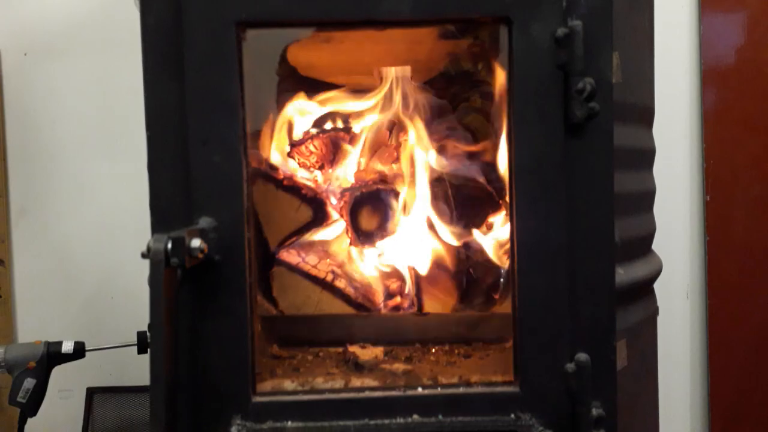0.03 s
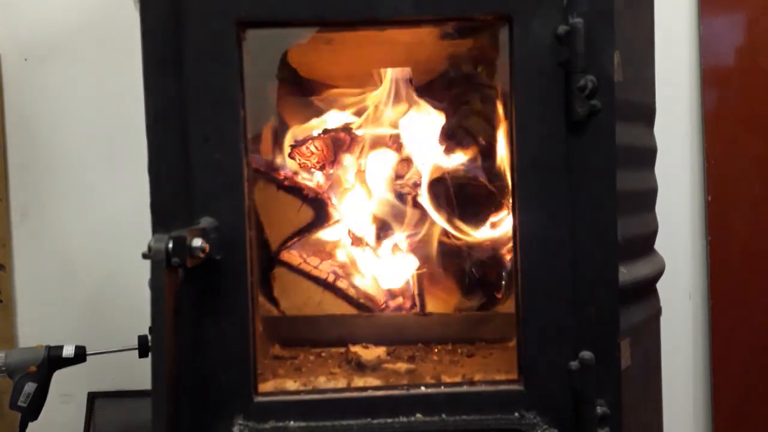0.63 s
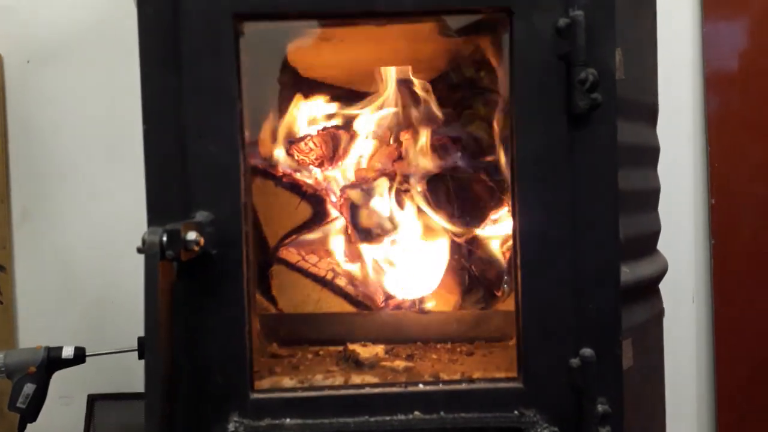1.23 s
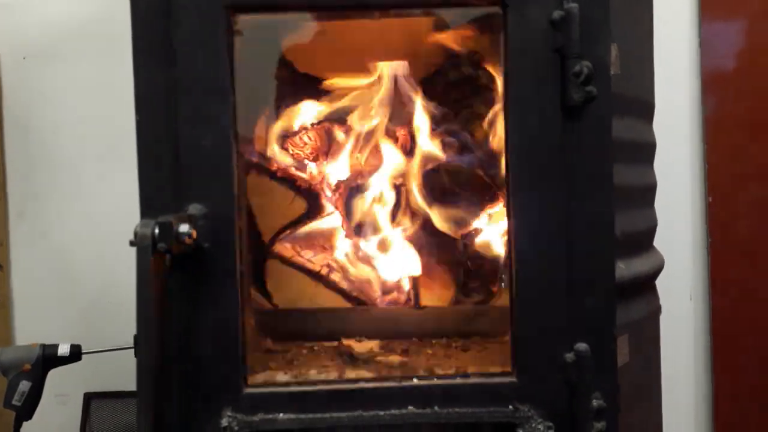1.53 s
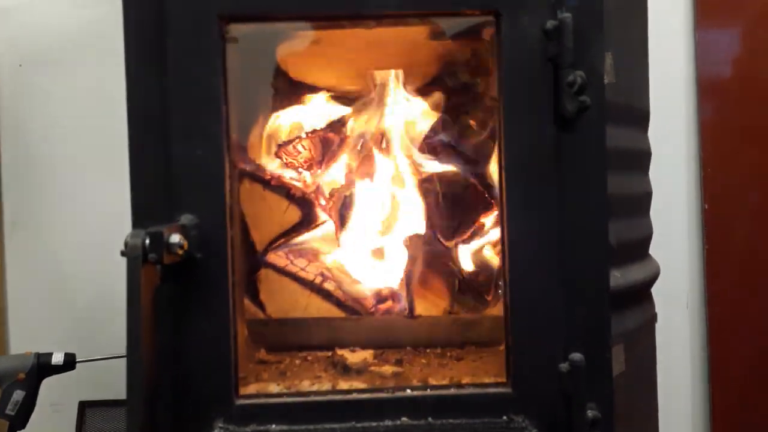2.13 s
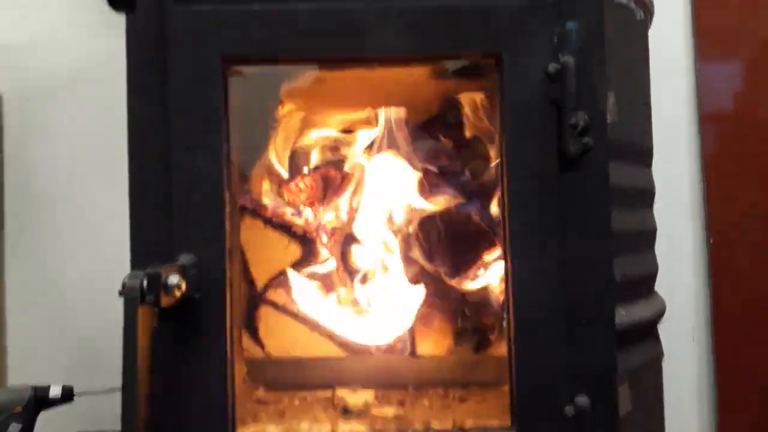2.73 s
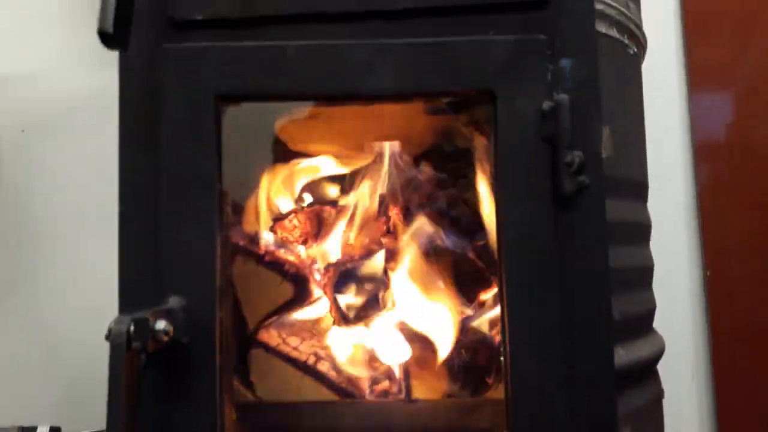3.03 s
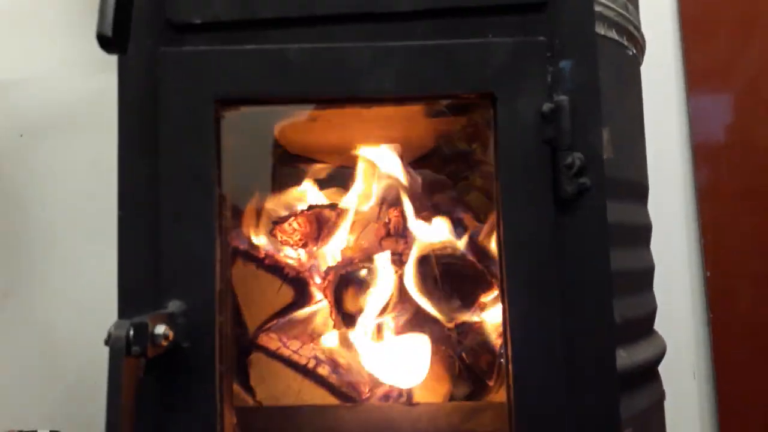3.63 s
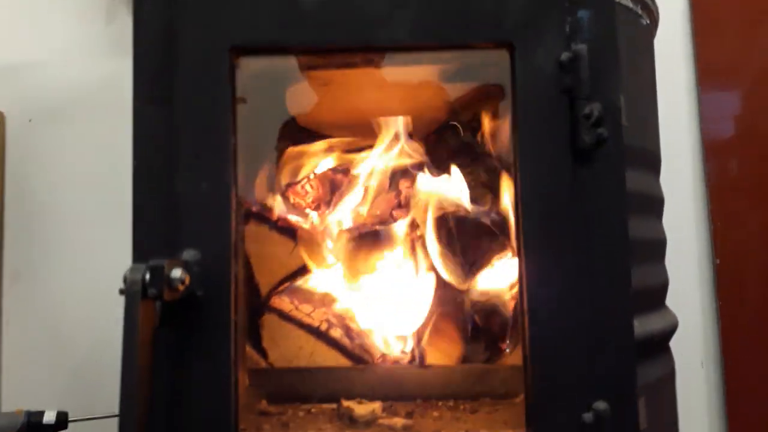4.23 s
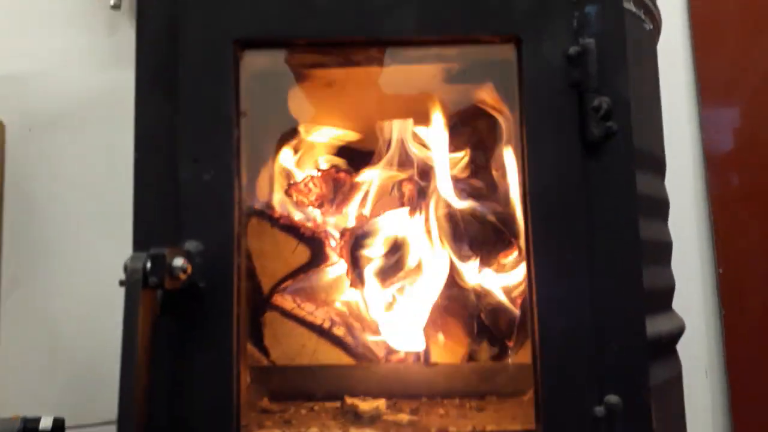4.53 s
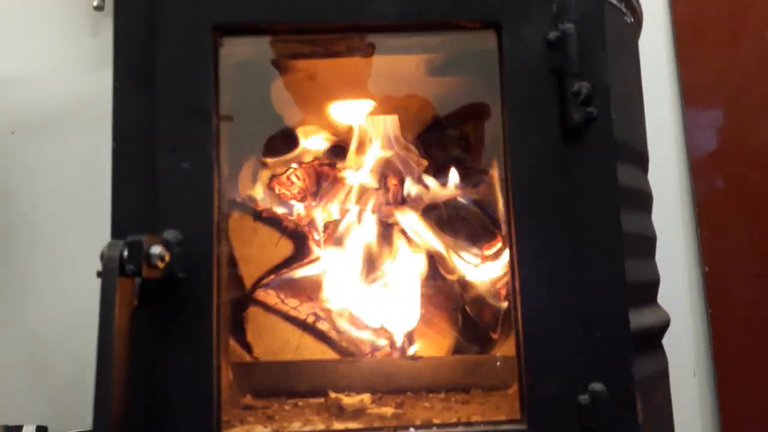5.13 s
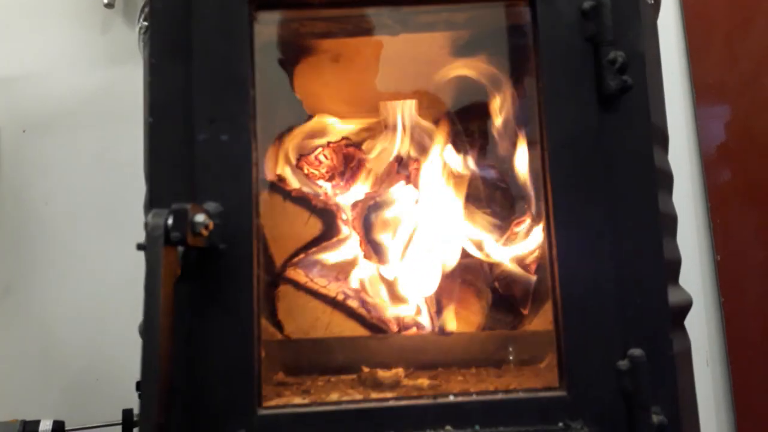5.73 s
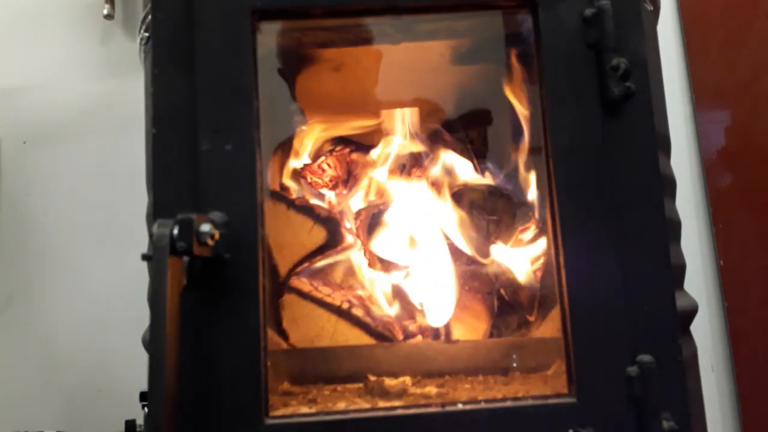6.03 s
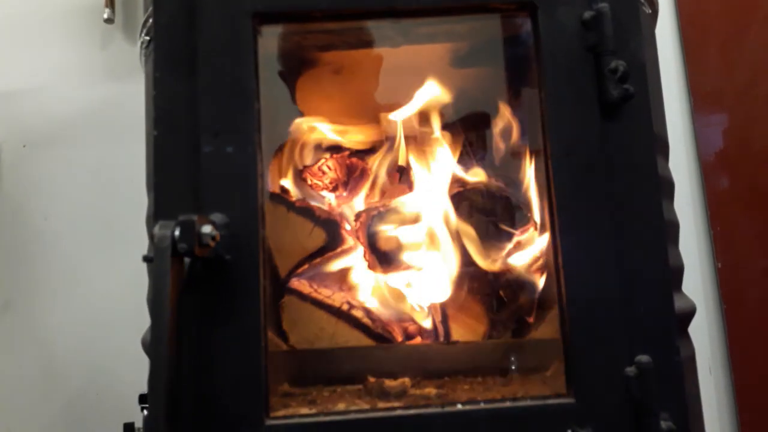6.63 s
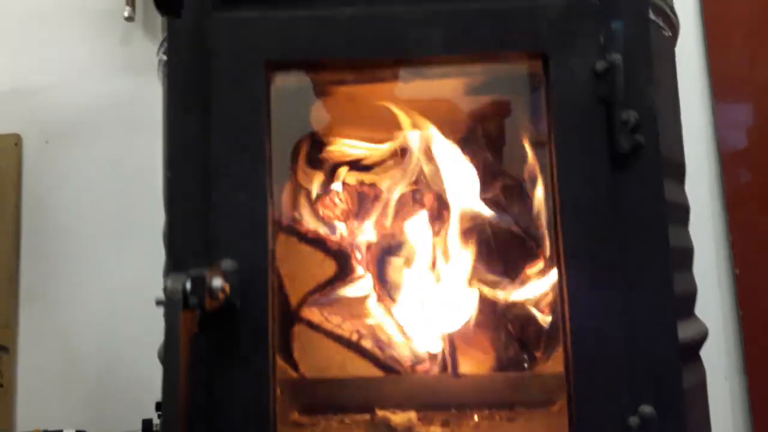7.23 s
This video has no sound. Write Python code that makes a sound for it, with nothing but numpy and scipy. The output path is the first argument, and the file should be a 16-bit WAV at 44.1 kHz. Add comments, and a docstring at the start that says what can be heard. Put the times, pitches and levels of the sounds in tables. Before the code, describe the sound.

Logs burn behind the glass door of an iron stove, making a low, fluttering rumble with soft thumps and faint, muffled pops. A small fan motor buzzes throughout, with a thin high whine and a light rush of air. About three seconds in comes one sharp snap, and the quiet crackling carries on with occasional thin ticks. It is heard indoors, from a hand-held phone an arm's length away.

```python
"""A room with an iron stove, an arm's length from a hand-held phone. Logs burn behind the glass door:
flames rumble in the firebox, gas pockets catch with soft thumps and resin bursts in dull pops.
Now and then something ticks, and once there is a sharp snap. A small fan motor buzzes throughout
over a rush of air; its overtones shift as the phone moves through the room's standing waves."""
import sys
import numpy as np
from scipy import signal
from scipy.fft import rfft, irfft, next_fast_len
from scipy.io import wavfile
from scipy.ndimage import uniform_filter1d

SR = 44100
rng = np.random.default_rng(int(sys.argv[2]) if len(sys.argv) > 2 else 0)


def to_wav(sig):
    """Store sig (one row per channel, or 1-D mono) as 16-bit WAV at the path in sys.argv[1].

    Samples outside -1..1 are clipped; the rate is SR.
    """
    pcm = np.clip(np.atleast_2d(sig), -1, 1) * 32767
    pcm = np.round(pcm).astype(np.int16)
    wavfile.write(sys.argv[1], SR, pcm.T)  # frames by channels


N = 325458
T = np.arange(N) / SR


def undb(db):
    """Decibels to gain."""
    return 10 ** (np.asarray(db) / 20)


def unit(x):
    """Scale to rms 1."""
    return x / np.sqrt(np.mean(x ** 2))


def glide(rows):
    """Rows of (seconds, value) joined by straight lines, corners rounded over a quarter second."""
    return uniform_filter1d(np.interp(T, *np.transpose(rows)), SR // 4)


def spectrum_db(points, hz):
    """Read (Hz, dB) points on a log-frequency axis."""
    point_hz, db = np.transpose(points)
    return np.interp(np.log(np.maximum(hz, 1)), np.log(point_hz), db)


def noise(points):
    """Noise whose density follows (Hz, dB per Hz) points."""
    size = next_fast_len(N, True)
    gain = undb(spectrum_db(points, np.fft.rfftfreq(size, 1 / SR)))
    return irfft(rfft(rng.standard_normal(size)) * gain, size)[:N] * np.sqrt(SR / 2)


def colour(x, points, size=1024):
    """Minimum-phase EQ through (Hz, dB) points: nothing rings ahead of the attack."""
    gain = undb(spectrum_db(points, np.fft.rfftfreq(size, 1 / SR)))
    cepstrum = irfft(np.log(gain))
    cepstrum[1:size // 2] *= 2
    cepstrum[size // 2 + 1:] = 0
    response = irfft(np.exp(rfft(cepstrum)))
    return signal.fftconvolve(x, response)[:len(x)]


def wander(per_s):
    """Smooth random movement with rms 1."""
    hold = int(SR / per_s)
    steps = np.repeat(rng.standard_normal(N // hold + 1), hold)
    return unit(uniform_filter1d(uniform_filter1d(steps, hold), hold)[:N])


def burst(points, decay_s, tail_db, tail_s, click=0, size=8192):
    """A noise hit with a tail and an optional click, EQ'd together; its loudest 3 ms have rms 1."""
    t = T[:size]
    envelope = np.exp(-t / decay_s) + undb(tail_db) * np.exp(-t / tail_s)
    hit = colour(rng.standard_normal(size) * envelope + click * (t == 0), points)
    return hit / np.sqrt(uniform_filter1d(hit ** 2, 130, mode="constant").max())


def damped_tone(hz, attack_s, size):
    """A sine whose envelope swells to 1 at attack_s and dies quickly."""
    t = T[:size]
    envelope = (t / attack_s * np.exp(1 - t / attack_s)) ** 2
    return envelope * np.sin(2 * np.pi * hz * t)


def add(out, start_s, x):
    """Mix x into out from start_s."""
    i = int(start_s * SR)
    out[i:i + len(x)] += x[:N - i]


# Rumble, coloured by firebox and flue. Each row: frequency in Hz, relative level in dB.
FIREBOX_EQ = [(20, -55), (33, -35), (48, -19), (62, -10.5), (80, -7.5), (100, -5), (124, 4.5), (143, -0.5),
              (165, -3.5), (220, -15), (300, -16.5), (400, -25), (490, -27.5), (750, -69)]
# Flapping flame tongues. Each row: frequency in Hz, density in dB per Hz.
FLAP_SPECTRUM = [(100, -100), (190, -82), (290, -81), (400, -90), (490, -84), (750, -103), (1500, -120)]
# Gas pockets catching. Each row: start in seconds, peak level in dB, pitch in Hz.
GAS_PUFFS = [(.155, -37.5, 135), (.465, -41.5, 126), (0.72, -38, 126), (1.306, -39, 149),
             (1.835, -41.5, 150), (2.602, -42, 128), (3.145, -39, 125), (4.075, -41, 122),
             (4.465, -41, 130), (5.976, -40.5, 118), (6.539, -33, 128), (6.736, -36.5, 113)]


def flames(rumble_db=-48, flicker_db=4, flap_depth_db=3.3, flare_s=0.022, flare_db=-6):
    """Turbulent burning rumbles, tongues flap in fits, and gas pockets light with a soft thump."""
    roar = noise(FIREBOX_EQ)
    power = uniform_filter1d(uniform_filter1d(roar ** 2, SR // 12), SR // 12)
    roar = roar / np.sqrt(power)  # held even, so flicker and flares shape the level
    flicker = undb(rumble_db + flicker_db * np.tanh(wander(per_s=18)))
    flares = sum(undb(db + flare_db) * np.exp(-.5 * ((T - start_s - flare_s / 2) / flare_s) ** 2)
                 for start_s, db, _ in GAS_PUFFS)
    strength = np.hypot(flicker, flares)
    flapping = noise(FLAP_SPECTRUM) * unit(np.sqrt(strength) * undb(flap_depth_db * wander(per_s=45)))
    out = roar * strength + flapping
    for start_s, db, hz in GAS_PUFFS:
        add(out, start_s, undb(db) * damped_tone(hz, attack_s=0.0068, size=SR // 5))
    return out


# A pop's crack on top and its thud below. Each row: frequency in Hz, relative level in dB.
CRACK_EQ = [(400, -19.5), (750, -1.5), (1000, 0.5), (1500, -2), (2100, -7.5), (3000, -11.5), (6000, -24),
            (12000, -40)]
THUD_EQ = [(120, -29), (300, 1.5), (500, -2.5), (800, -13.5), (1600, -51)]
# Pops behind the glass. Each row: start in seconds, crack level and thud level in dB before trim.
RESIN_POPS = [(0.636, -48.5, -46), (1.201, -52, -53), (1.236, -47, -57), (2.335, -50, -46),
              (2.658, -51.6, -43.5), (2.749, -49, -42.5), (2.785, -56, -45.5), (2.986, -54, -44.5),
              (3.228, -48, -42), (3.724, -46.5, -50), (4.011, -51, -58), (4.028, -46.5, -46.5),
              (4.294, -49, -39.5), (4.375, -58, -45), (4.467, -47, -41.5), (4.516, -55, -46),
              (4.549, -51, -43), (5.186, -49, -56), (5.456, -46, -44), (5.657, -49, -53), (5.744, -47, -46),
              (5.844, -46, -44.5), (6.175, -49, -44.5)]


def resin_pops(crack_trim_db=0.6, thud_trim_db=.5):
    """Resin pockets burst in the logs, muffled by iron and glass."""
    out = np.zeros(N)
    for start_s, crack_db, thud_db in RESIN_POPS:
        crack = burst(CRACK_EQ, decay_s=0.0015, tail_db=-10, tail_s=.012, click=22)
        thud = burst(THUD_EQ, decay_s=0.0013, tail_db=-16.5, tail_s=0.021, click=5.9)
        add(out, start_s, undb(crack_db + crack_trim_db) * crack + undb(thud_db + thud_trim_db) * thud)
    return out


def crackle(level_db=-56.5, spread_db=1.5, cluster_s=.13, clustered_share=.7, count=120):
    """Smaller pops, most of them gathered around the big ones."""
    out = np.zeros(N)
    for _ in range(count):
        near_pop = RESIN_POPS[rng.integers(len(RESIN_POPS))][0] + cluster_s * rng.standard_normal()
        anywhere = rng.uniform(0, T[-1])
        start_s = near_pop % T[-1] if rng.random() < clustered_share else anywhere
        crack = burst(CRACK_EQ, decay_s=0.002, tail_db=-17, tail_s=0.0074, click=5.1)
        thud = burst(THUD_EQ, decay_s=0.0039, tail_db=-13, tail_s=0.0061)
        add(out, start_s, undb(level_db + spread_db * rng.standard_normal()) * (crack + thud))
    return out


# The snap's resonances. Each row: pitch in Hz, peak level in dB, attack in seconds.
SNAP_MODES = [(637, -28, 0.0016), (1450, -22.5, 0.0011), (2680, -15.5, 0.00034), (3430, -36, 0.00027),
              (5000, -29, 0.00028), (7440, -33, 0.00044), (10500, -37, 0.00029)]


def snap(start_s=3.1772, echo_delay_s=0.001724, echo_db=-38):
    """One sharp snap: a few heavily damped modes, then a short scatter of reflections."""
    out = np.zeros(N)
    for hz, db, attack_s in SNAP_MODES:
        add(out, start_s, undb(db) * damped_tone(hz, attack_s, size=SR // 20))
    scatter = burst(CRACK_EQ, decay_s=0.0015, tail_db=-6, tail_s=0.0067)
    add(out, start_s + echo_delay_s, undb(echo_db) * scatter)
    return out


# Bright ticks that ring on in the room. Each row: start in seconds, level in dB, band centre in Hz.
BRIGHT_TICKS = [(.637, -70, 13100), (.796, -69, 8000), (0.951, -61, 7100), (1.95, -66, 7200),
                (2.734, -62.5, 10300), (2.951, -62, 9800), (3.228, -67, 7600), (3.774, -58, 5700),
                (3.779, -66, 11500), (3.954, -56.5, 6300), (4.573, -70, 10950), (4.951, -64, 7540),
                (5.841, -66, 8460), (6.953, -62, 6900), (7.146, -62, 12500), (7.335, -61, 8450)]


def ticks(skirt_db=-14):
    """Thin ticks, probably hot metal expanding, heard mostly through the room."""
    out = np.zeros(N)
    for start_s, db, hz in BRIGHT_TICKS:
        band = [(hz / 4, 2 * skirt_db), (hz / 2, skirt_db), (hz, 0), (2 * hz, 2 * skirt_db)]
        add(out, start_s, undb(db) * burst(band, decay_s=0.0082, tail_db=1, tail_s=0.067))
    return out


# The phone's path. Each row: time in seconds, position (0 is the first stance, 1 the second).
PHONE_PATH = [(0, 0.013), (2.7, -0.1), (3.1, .27), (3.9, 0.17), (4.3, .7), (5.3, 0.61), (6.3, 1.34),
              (7, 0.85), (7.38, .55)]
# The buzz's strong overtones. Each row: harmonic number, base level in dB at stance one, then two.
STRONG_OVERTONES = [(5, -58.5, -60.5), (6, -55.5, -55.5), (7, -57, -57.5), (8, -57.5, -58), (9, -67, -66),
                    (10, -76.5, -64), (11, -60.5, -60.5), (12, -70.5, -64.5), (15, -73.5, -65),
                    (16, -61.5, -64), (18, -62, -62), (21, -74, -100), (26, -68.5, -68.5), (28, -66, -62),
                    (31, -65, -58.5), (32, -61.5, -65), (35, -64.5, -58), (36, -57.5, -54),
                    (37, -60.5, -59), (38, -53.5, -59.5), (39, -56, -53), (41, -61, -54.5),
                    (43, -58.5, -86), (44, -58, -57.5), (45, -61.5, -68.5), (48, -63.5, -69),
                    (50, -55, -68.5), (52, -62.5, -76), (54, -63.5, -61.5), (56, -66, -60.5)]
# The contour of all its other overtones. Each row: frequency in Hz, base level in dB.
WEAK_OVERTONES = [(90, -65), (270, -66.5), (360, -89), (1200, -69), (1950, -73), (2450, -69), (2650, -71),
                  (4250, -63), (5750, -70.5), (6400, -87.5), (7600, -96), (8600, -91), (9400, -108)]
# A level ride on the buzz's upper whine. Each row: time in seconds, boost or cut in dB.
WHINE_RIDE = [(0, -1), (1.4, 1.7), (3.1, 2.5), (3.9, 2), (4.3, 2), (4.9, 3), (5.7, -2), (6.6, -3),
              (7.3, 1.5)]


def fan_buzz(buzz_hz=90.31, drift=.0004, flutter=0.047, strong_trim_db=-0.18,
             travel_m=0.076, direct_gain=0.69, room_hz=1800, smear_s_per_hz=2e-6,
             whine_hz=5100, whine_sink_hz=600, whine_width_hz=480, paths=8, hop=256):
    """The motor rattles once a cycle; its room reflections shift in phase as the phone moves."""
    motor_phase = 2 * np.pi * np.cumsum(buzz_hz * (1 + drift * wander(per_s=1))) / SR
    position, ride_db = glide(PHONE_PATH)[::hop], glide(WHINE_RIDE)[::hop]
    stance_db = {round(k): (first, second) for k, first, second in STRONG_OVERTONES}
    rotor = np.exp(1j * motor_phase)
    overtone, out = np.ones(N, complex), np.zeros(N)
    for k in range(1, 101):
        hz = k * buzz_hz
        angle, offset = rng.uniform(0, 2 * np.pi, (2, paths, 1))
        wavenumber = 2 * np.pi * hz / 343
        path_phase = offset + wavenumber * travel_m * position * np.cos(angle)
        reflections = np.exp(1j * path_phase).sum(0) / np.sqrt(paths)
        # the casing sends out the highs first, smearing each rattle into a falling chirp
        chirp = np.exp(1j * np.pi * smear_s_per_hz * hz ** 2)
        # overtones below room_hz arrive mostly by way of the room
        field = direct_gain * min(hz / room_hz, 1) * chirp + reflections
        if k in stance_db:
            level_db = strong_trim_db + np.interp(position, (0, 1), stance_db[k])
            field = field / (abs(field) + 0.11)  # evens out all but the deepest nulls
        else:
            level_db = spectrum_db(WEAK_OVERTONES, hz)
            field = field / np.sqrt(np.mean(abs(field) ** 2))
        whine_centre_hz = whine_hz - whine_sink_hz * position
        whine_db = ride_db * np.exp(-.5 * ((hz - whine_centre_hz) / whine_width_hz) ** 2)
        field = field * undb(level_db + whine_db) * (1 + flutter * rng.standard_normal(len(position)))
        overtone = overtone * rotor  # step up to harmonic k
        out += (np.interp(T, T[::hop], field) * overtone).real
    return np.sqrt(2) * out, motor_phase


# The fan's airy wash. Each row: frequency in Hz, density in dB per Hz.
AIR_SPECTRUM = [(200, -104), (700, -99), (1400, -99), (1900, -103), (2900, -100), (3500, -95.5),
                (4700, -97.5), (5600, -101), (6500, -114), (8400, -114), (9300, -128)]


def fan_air(motor_phase, throb=0.076):
    """Air rushes through the fan, pulsing slightly with each cycle of the motor."""
    return noise(AIR_SPECTRUM) * (1 + throb * np.cos(motor_phase))


# The bed of hiss. Each row: frequency in Hz, density in dB per Hz at the centre of the stereo image.
HISS_SPECTRUM = [(4000, -145), (7000, -118.5), (9400, -121), (11100, -115), (12200, -116), (16000, -115.5)]


def hiss(side_db=-5.5):
    """A faint, even hiss with a little stereo width."""
    middle = noise(HISS_SPECTRUM)
    side = undb(side_db) * noise(HISS_SPECTRUM)
    return np.array([middle + side, middle - side])


def scene():
    """Stove and fan sit in the centre; only the hiss spreads left and right."""
    buzz, motor_phase = fan_buzz()
    fan = buzz + fan_air(motor_phase)
    stove = flames() + resin_pops() + crackle() + ticks() + snap()
    return stove + fan + hiss()


def record(dry, low_cut_hz=34, high_cut_hz=15750):
    """The phone drops the deepest bass and cuts the top steeply."""
    low_cut = signal.butter(2, low_cut_hz, "high", fs=SR, output="sos")
    high_cut = signal.ellip(10, .1, 70, high_cut_hz, fs=SR, output="sos")
    return signal.sosfilt(high_cut, signal.sosfilt(low_cut, dry))


dry = scene()
out = record(dry)
to_wav(out)
```